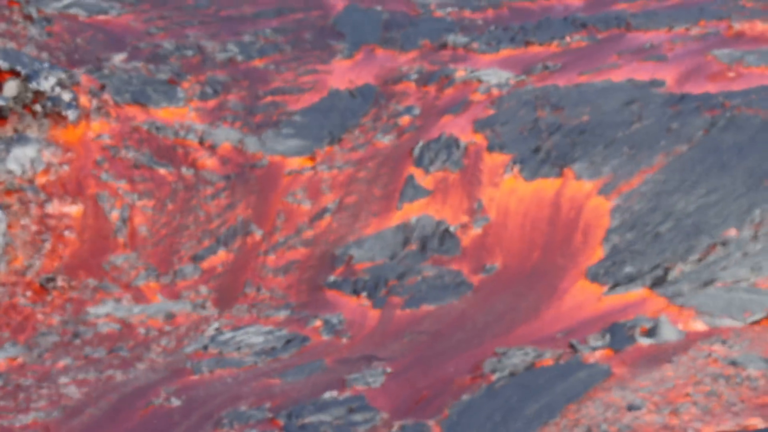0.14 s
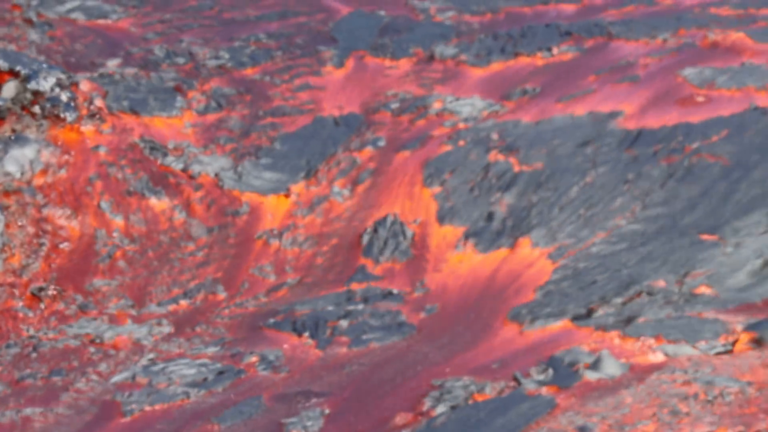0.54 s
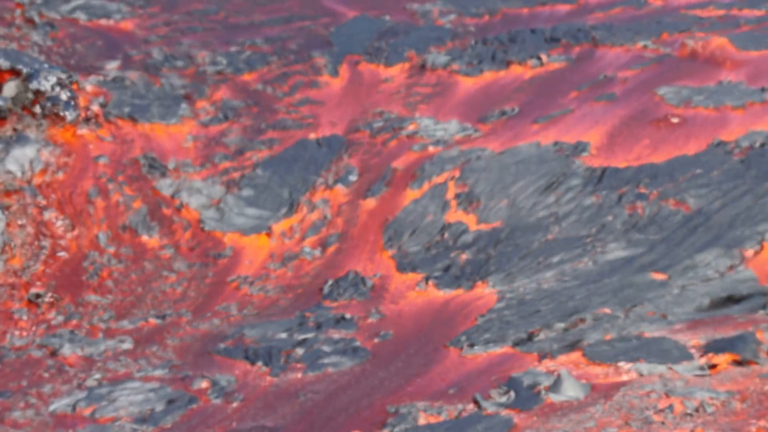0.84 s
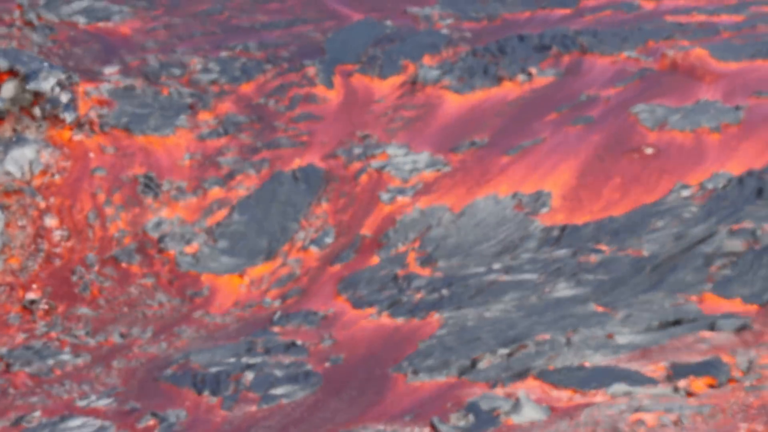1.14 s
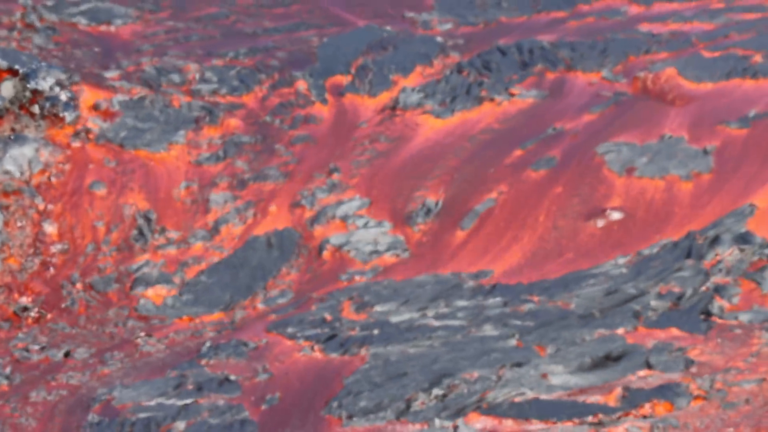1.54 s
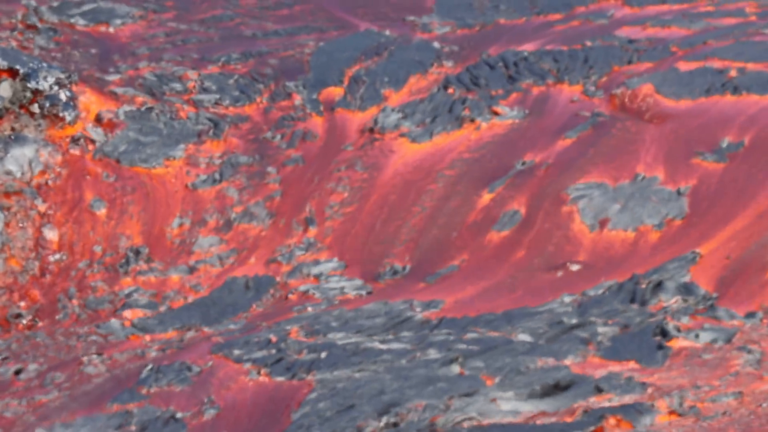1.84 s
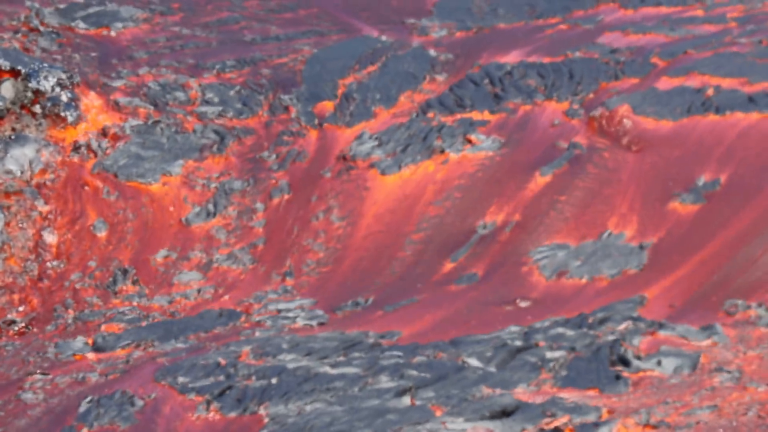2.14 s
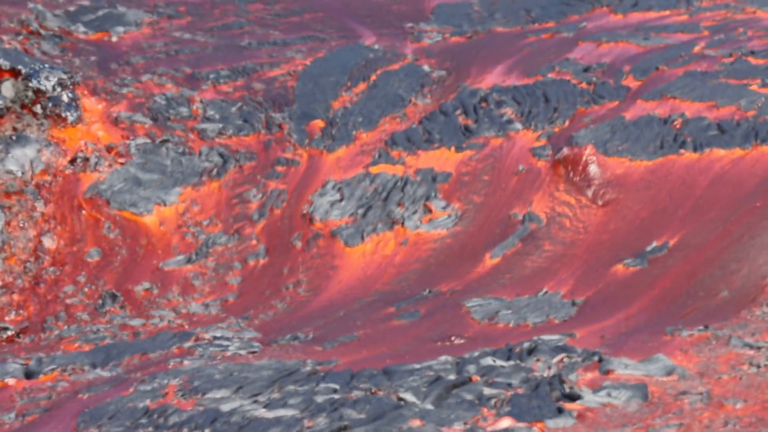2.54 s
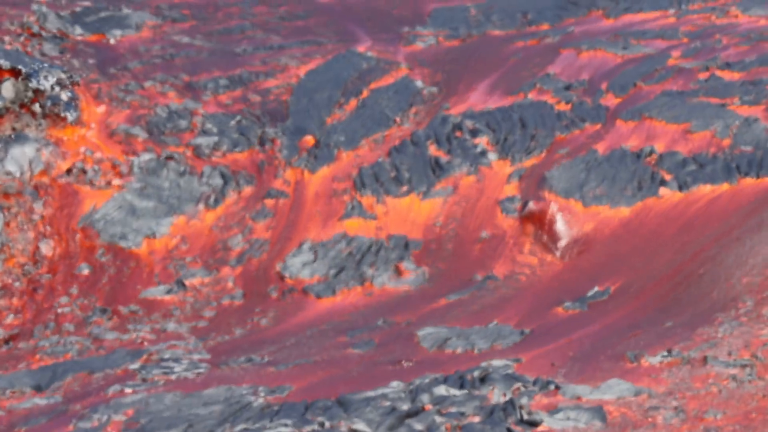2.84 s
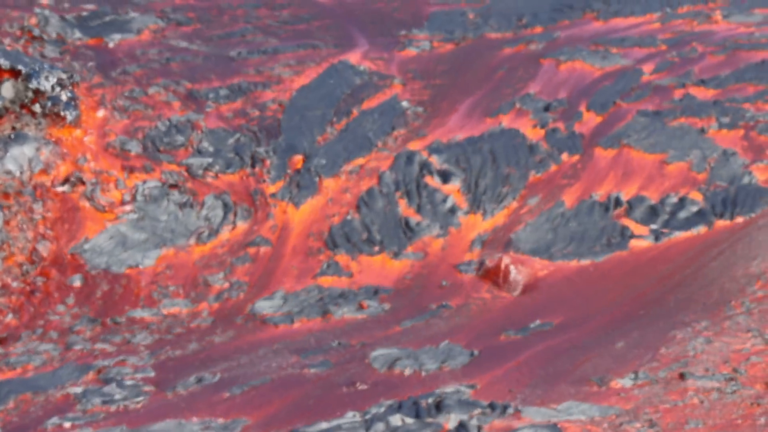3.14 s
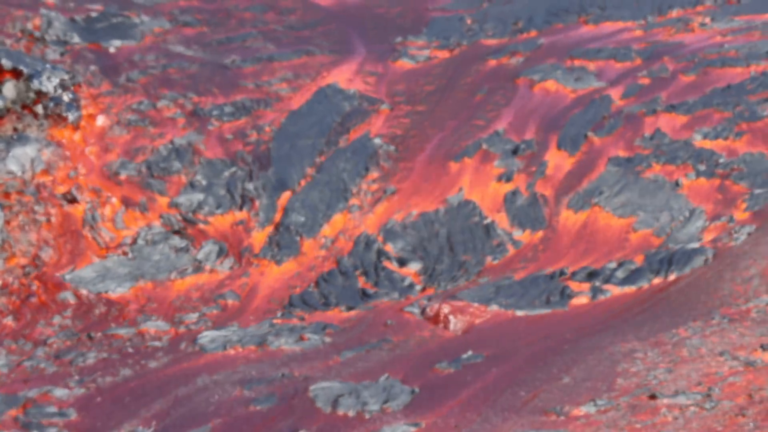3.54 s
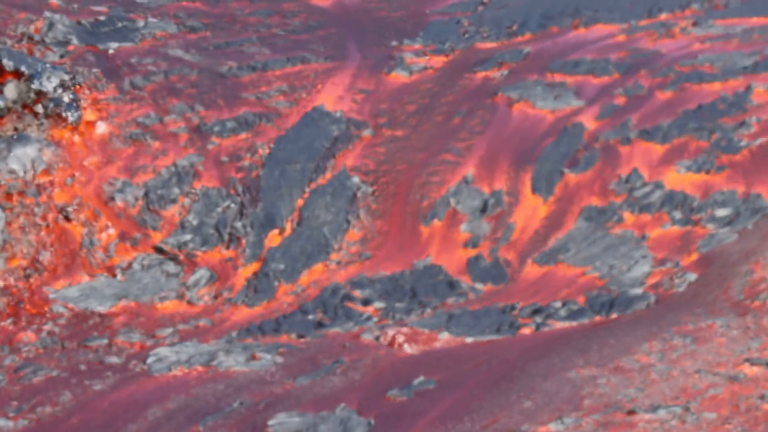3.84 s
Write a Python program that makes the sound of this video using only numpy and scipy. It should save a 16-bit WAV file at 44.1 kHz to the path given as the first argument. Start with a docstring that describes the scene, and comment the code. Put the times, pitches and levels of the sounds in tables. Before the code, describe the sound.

Wind buffets the microphone in low gusts while a lava stream rushes and faintly ticks.

```python
"""Fast lava stream in the wind

Gusts of wind hit the microphone with a low roar and a few thumps, and the air whistles faintly.
Behind them the lava keeps up an even rushing sound, with a fine crackle of tiny cracks.
The cooling crust ticks as chips break off and scrapes as its plates rub together.
Once, something sticks and slips with a thin, stuttering squeak."""
import sys
import numpy as np
from scipy import signal
from scipy.fft import rfft, irfft
from scipy.io import wavfile

SR = 44100
rng = np.random.default_rng(int(sys.argv[2]) if len(sys.argv) > 2 else 0)


def file_out(sig):
    """Save sig as 16-bit WAV at sys.argv[1]."""
    # one column per channel
    cols = np.atleast_2d(sig).T
    # limit, then scale
    lim = np.clip(cols, -1, 1)
    pcm = np.round(lim * 32767).astype(np.int16)
    wavfile.write(sys.argv[1], SR, pcm)


N = 176400  # 4 seconds

# How the gusts rise and fall. Each row: time in seconds, rumble in dB, roar in dB.
# The wind's tone and the two gains below act on top of these levels.
GUST_LEVELS = [(0, -44, -54.5), (.09, -37, -54.5), (.2, -42, -79), (.28, -48, -82), (.33, -37, -54),
               (.41, -39.5, -58), (.47, -25.5, -41), (.54, -29, -41.5), (.58, -22, -35.5),
               (.62, -27.5, -40), (.75, -31.5, -43.5), (.87, -32.5, -48), (.97, -38, -64),
               (1.1, -34.5, -49.5), (1.2, -29, -43), (1.32, -28, -39.5), (1.52, -30.5, -37),
               (1.62, -32.5, -38.5), (1.72, -31.5, -40), (1.91, -35, -41), (1.97, -32, -43.5),
               (2.07, -38, -44.5), (2.12, -33, -37.5), (2.2, -31, -44.5), (2.24, -38, -41.5),
               (2.28, -38, -43.5), (2.315, -35, -39), (2.39, -36.5, -42), (2.52, -38.5, -40.5),
               (2.58, -30.5, -36), (2.625, -34, -39.5), (2.67, -30, -34.5), (2.72, -25.5, -32.5),
               (2.79, -29.5, -37.5), (2.85, -24, -32.5), (2.91, -27, -37), (2.945, -26, -34.5),
               (3.03, -25, -38.5), (3.11, -26.5, -37), (3.2, -28, -38), (3.39, -32, -37), (3.45, -30, -43),
               (3.51, -36, -45), (3.62, -41.5, -46.5), (3.655, -48, -56), (3.74, -48, -57),
               (3.77, -35, -49.5), (3.8, -42, -49.5), (3.84, -30.5, -40.5), (3.885, -39, -54),
               (3.92, -35.5, -50), (3.97, -31, -43), (4, -21, -44)]
RUMBLE_GAIN_DB, ROAR_GAIN_DB = 0.5, 9.5
# The tone of the wind. Each row: frequency in Hz, relative level in dB.
WIND_TONE = [(15, -7.5), (38, 1), (90, -0.5), (170, -5.5), (300, -10.5), (600, -19), (1100, -30),
             (2200, -40), (5000, -64.5), (16000, -96)]
# Swirls of air that hit the microphone. Each row: time in seconds, peak in dB, half width in seconds.
EDDIES = [(0.566, -15, 0.004), (1.456, -25, 0.0015), (2.12, -28, 0.0035), (2.317, -26.5, 0.0014),
          (2.843, -19, .005), (2.951, -15.5, 0.0044), (3.086, -21, 0.0015), (3.393, -19.5, 0.0024),
          (3.847, -24.5, 0.0025), (3.912, -26.5, 0.0048)]
# The tone of the rushing lava. Each row: frequency in Hz, relative level in dB.
LAVA_TONE = [(40, 0), (150, -1.5), (420, -4.5), (750, -12), (1000, -10.5), (1400, -14.5), (2200, -17.5),
             (3300, -22), (5000, -29.5), (7800, -39.5), (12000, -41.5), (15500, -48)]
# How loud the lava rushes. Each row: time in seconds, level in dB.
LAVA_LEVELS = [(0, -47), (.3, -49), (1.0, -44.5), (1.6, -46.5), (2.0, -47.5), (2.5, -46), (2.75, -46),
               (3.2, -44), (3.5, -47.5), (3.68, -48.5), (3.87, -50.5), (4, -46.5)]
# The tone of the lava's thin hiss. Each row: frequency in Hz, relative level in dB.
HISS_TONE = [(1000, -20), (5000, 2), (9500, -1.5), (13500, -2.5), (15600, -4)]
# Ticks of the crust. Each row: start in seconds, peak in dB, pitch in Hz,
# seconds to fade by 60 dB, level of the grit against the ring in dB.
CRUST_TICKS = [(.175, -48, 7200, .009, -2), (.1915, -48, 6300, .008, 2), (0.2928, -42.5, 2020, 0.016, -16),
               (.310, -40.5, 2300, .009, -16), (.316, -48, 5300, .005, -1), (.896, -48, 6600, .009, 0),
               (0.9173, -34, 4590, 0.0077, -24), (1.2627, -36, 1700, .009, -20),
               (1.2816, -46, 11000, .004, 4), (1.283, -38, 6850, 0.0073, -6), (1.676, -32, 1500, .006, -20),
               (1.719, -47, 4000, .004, -14), (1.953, -39, 676, 0.025, -24), (2.2795, -45, 7500, 0.0058, 8),
               (2.412, -50, 5930, .006, -12), (3.5465, -44, 5600, .0025, 10)]
# The notes a chip of crust rings with. Each row: multiple of the pitch, relative level in dB.
CHIP_NOTES = [(1, 0), (1.09, -6.5), (1.27, -7), (1.62, -21), (2.07, -23)]
# Scrapes of the crust. Each row: start in seconds, length in seconds, level in dB,
# pitch in Hz, width of the noise band in Hz.
CRUST_SCRAPES = [(0.199, 0.017, -63, 8540, 2200), (1.579, .025, -52, 1200, 450),
                 (1.653, 0.022, -56.5, 9900, 3600), (1.655, 0.034, -61.5, 5940, 350),
                 (1.678, 0.011, -62, 11200, 900), (2.434, 0.023, -53.5, 2970, 1100),
                 (2.547, 0.03, -56, 3300, 1800), (3.345, .06, -70, 12300, 1400)]
# The pieces of the squeak. Each row: start in seconds, length in seconds, level in dB, pitch in Hz.
SQUEAK_SLIPS = [(.8075, .018, -44, 3270), (.819, 0.041, -56, 3310), (0.854, .014, -51, 3370),
                (.8675, 0.016, -46.5, 3265)]
# The notes in the squeak. Each row: multiple of the pitch, relative level in dB.
SQUEAK_NOTES = [(.805, -6), (1, -1), (1.137, -15), (1.277, -13.5)]
# The notes of the whistle. Each row: pitch in Hz, width in Hz, relative level in dB.
WHISTLE_NOTES = [(1365, 44, 1.5), (2073, 23, -5)]
# The whistle swells as the big gust dies away. Each row: time in seconds, level in dB.
WHISTLE_LEVELS = [(3.2, -80), (3.42, -63), (3.68, -59.5), (3.85, -78), (4, -72)]


def wind(split_hz=257):
    """Rough air on the microphone: a deep rumble and a fluttering roar rise with each gust."""
    gusts = np.array(GUST_LEVELS)
    rumble_db = RUMBLE_GAIN_DB + curve(gusts[:, [0, 1]])
    roar_db = ROAR_GAIN_DB + curve(gusts[:, [0, 2]])
    bass_share = 1 / (1 + (frequencies() / split_hz) ** 4)
    hollow_ring = from_db(4 * resonance(hz=427, width_hz=18))
    flutter_db = 0.9 * wander(per_second=70)
    rumble = noise(tone(WIND_TONE) * np.sqrt(bass_share))
    roar = noise(tone(WIND_TONE) * np.sqrt(1 - bass_share) * hollow_ring)
    return rumble * from_db(rumble_db) + roar * from_db(roar_db + flutter_db)


def wind_thumps():
    """Each passing swirl of air makes one dip in pressure between two smaller crests."""
    out = np.zeros(N)
    for when, db, half_width in EDDIES:
        offset = (np.arange(N) / SR - when) / half_width
        out += from_db(db) * (offset ** 2 - 1) * np.exp(-offset ** 2 / 2)
    return out


def lava_rush(hiss_db=-69):
    """The stream rushes in bands of noise that waver together and flicker alone, over a thin hiss."""
    waver_db = 0.28 * wander(per_second=6.6)
    octave = np.log2(frequencies() / 30)  # octaves above 30 Hz
    rush = np.zeros(N)
    for centre in range(10):
        band = np.sqrt(np.maximum(1 - abs(octave - centre), 0))
        band_noise = noise(tone(LAVA_TONE) * band)
        flicker_db = wander(per_second=25.19)
        rush += band_noise * from_db(waver_db + flicker_db)
    hiss = noise(tone(HISS_TONE)) * from_db(hiss_db - 0.5 * wander(per_second=14))
    return rush * from_db(curve(LAVA_LEVELS)) + hiss


def chip_snap(hz, fade_s, grit_db, attack_s=0.00027):
    """A chip of crust breaks: a short ring and a little gritty noise, dulled by distance."""
    t = np.arange(2048) / SR
    ring = sum(from_db(db) * np.sin(2 * np.pi * hz * ratio * t)
               for ratio, db in CHIP_NOTES if hz * ratio < SR / 2)
    soften = signal.butter(2, 11500, fs=SR)
    grit = from_db(grit_db) * signal.lfilter(*soften, rng.standard_normal(len(t)))
    attack = 1 - np.exp(-t / attack_s)
    snap = (ring + grit) * attack * from_db(-60 * t / fade_s)
    return snap / np.max(abs(snap))


def crust_ticks():
    """The nearest cracks in the crust stand out as sharp ticks."""
    out = np.zeros(N)
    for start, db, hz, fade_s, grit_db in CRUST_TICKS:
        add(out, start, from_db(db) * chip_snap(hz, fade_s, grit_db))
    return out


def crust_scrapes():
    """Plates of crust rub together, making short swells of noise around one pitch."""
    out = np.zeros(N)
    for start, length, db, hz, width_hz in CRUST_SCRAPES:
        samples = int(length * SR)
        rub = noise(resonance(hz, width_hz))[:samples]
        add(out, start, from_db(db) * normalize(rub) * swell(samples, rise_share=0.51))
    return out


def squeak(jitter_share=0.016):
    """Something sticks and slips: a few clean, shaky notes swell and die together."""
    out = np.zeros(N)
    for start, length, db, hz in SQUEAK_SLIPS:
        samples = int(length * SR)
        ring = np.zeros(samples)
        for ratio, note_db in SQUEAK_NOTES:
            jitter = jitter_share * wander(per_second=500)[:samples]
            pitch = hz * ratio * (1 + jitter)
            ring += from_db(note_db) * np.sin(2 * np.pi * np.cumsum(pitch) / SR)
        add(out, start, from_db(db) * normalize(ring) * swell(samples, rise_share=0.23))
    return out


def air_whistle():
    """Moving air sounds two faint, breathy notes."""
    gain = sum(from_db(db) * resonance(hz, width_hz) for hz, width_hz, db in WHISTLE_NOTES)
    return normalize(noise(gain)) * from_db(curve(WHISTLE_LEVELS))


def crackle(per_second=150, level_db=-66):
    """Tiny cracks open all over the stream, most of them lost in the rush."""
    out = np.zeros(N)
    for when, size, height in rng.random((int(per_second * N / SR), 3)):
        hz = 1550 * 4.65 ** height
        size_db = 1.5 * min(-np.log(1 - size), 3)  # big cracks are rare
        gain = from_db(size_db - 8 * height)  # higher cracks are quieter
        add(out, when * N / SR, gain * chip_snap(hz, fade_s=0.0022, grit_db=-9))
    return normalize(out) * from_db(level_db)


def from_db(db):
    """Turn decibels into a number to multiply by."""
    return 10 ** (np.asarray(db) / 20)


def normalize(x):
    """Scale to an average strength (rms) of 1."""
    return x / np.sqrt(np.mean(x ** 2) + 1e-24)


def curve(rows):
    """Join (seconds, value) rows with straight lines."""
    return np.interp(np.arange(N) / SR, *np.array(rows).T)


def swell(samples, rise_share):
    """Rise from 0 to 1 over a share of the length, then fall back to 0."""
    return np.interp(np.linspace(0, 1, samples), [0, rise_share, 1], [0, 1, 0])


def wander(per_second):
    """Glide between random values, with a spread near 1."""
    points = rng.standard_normal(2048)
    return 1.3 * np.interp(np.arange(N) / SR * per_second, np.arange(2048), points)


def frequencies():
    """The frequencies in the sound's spectrum, in Hz."""
    return np.maximum(np.arange(N // 2 + 1) * SR / N, 1)


def tone(rows):
    """Turn (Hz, dB) rows into gains that shape noise but keep its overall strength."""
    hz, db = np.array(rows).T
    return normalize(from_db(np.interp(np.log(frequencies()), np.log(hz), db)))


def resonance(hz, width_hz):
    """Gains that peak at one frequency and fall away on both sides."""
    return 1 / (1 + (2 * (frequencies() - hz) / width_hz) ** 2)


def noise(gain):
    """Noise with the given gain at each frequency."""
    return irfft(rfft(rng.standard_normal(N)) * gain, N)


def add(out, start, sound):
    """Mix a sound in at a start time in seconds."""
    i = int(np.clip(start * SR, 0, N - 1))
    out[i:i + len(sound)] += sound[:N - i]


def scene():
    """Mix the air and the lava into one channel."""
    air = wind() + wind_thumps() + air_whistle()
    return (air + lava_rush() + crust_ticks() + crust_scrapes() + squeak() + crackle())[None]


def record(dry):
    """Cut away the highest treble, above 15550 Hz."""
    return signal.sosfilt(signal.ellip(10, .1, 80, 15550, fs=SR, output="sos"), dry)


dry = scene()
out = record(dry)
file_out(out)
```